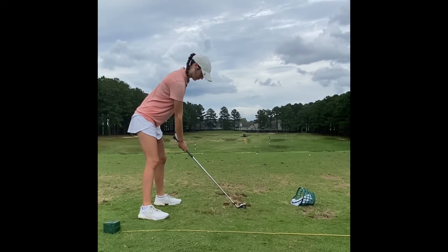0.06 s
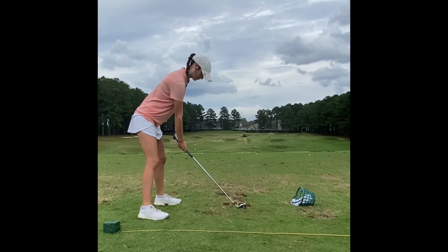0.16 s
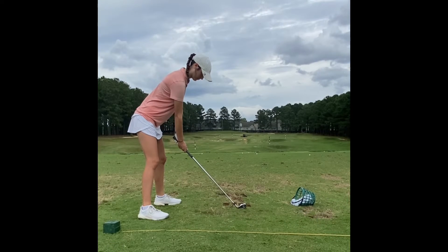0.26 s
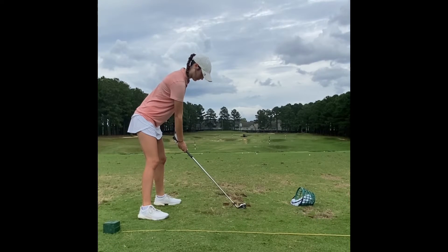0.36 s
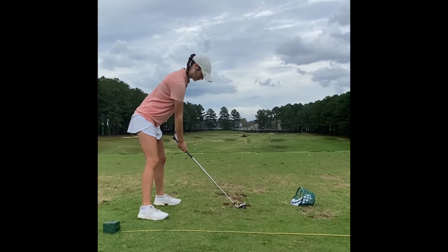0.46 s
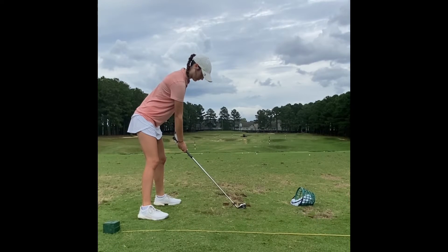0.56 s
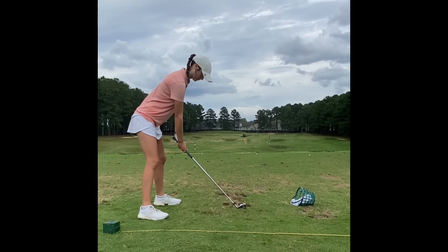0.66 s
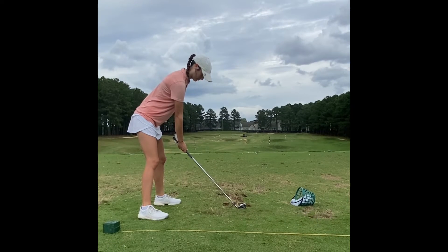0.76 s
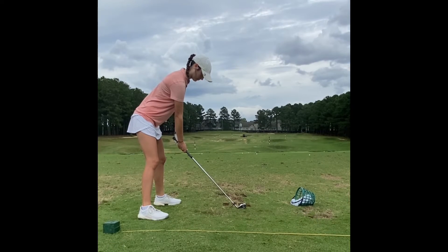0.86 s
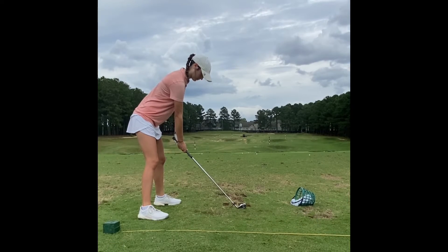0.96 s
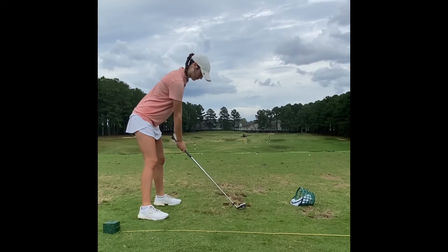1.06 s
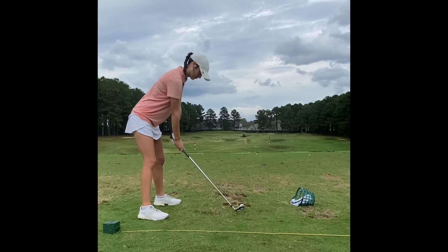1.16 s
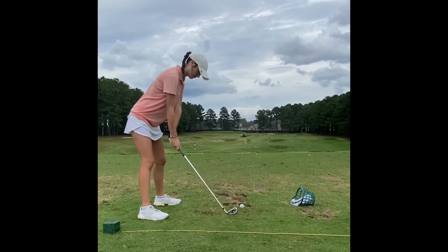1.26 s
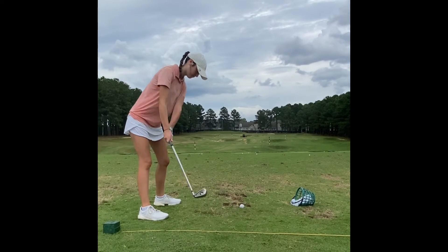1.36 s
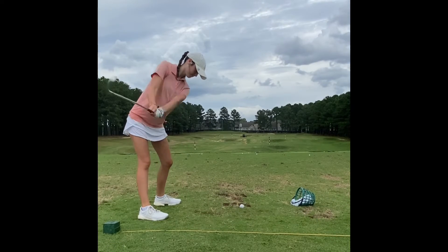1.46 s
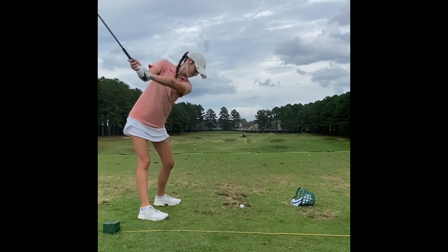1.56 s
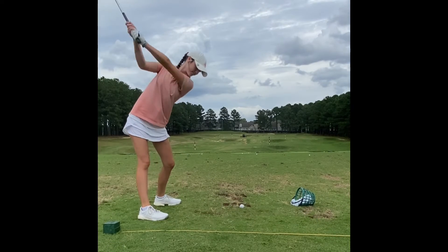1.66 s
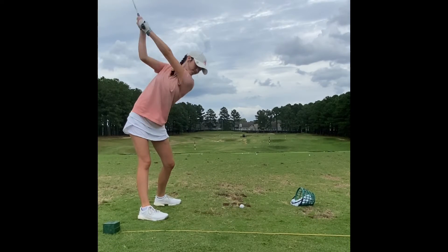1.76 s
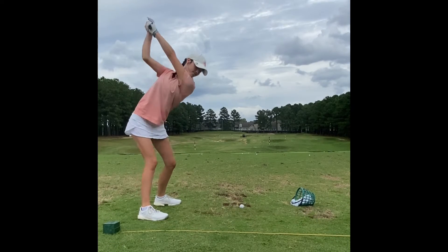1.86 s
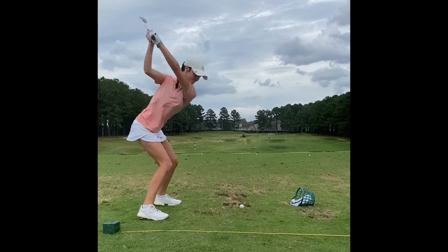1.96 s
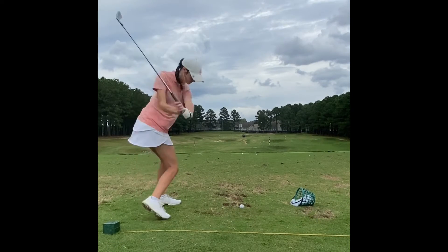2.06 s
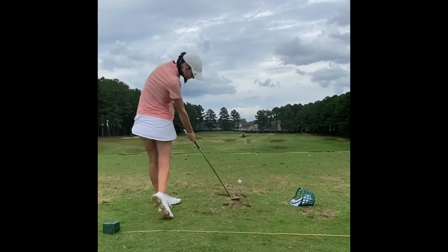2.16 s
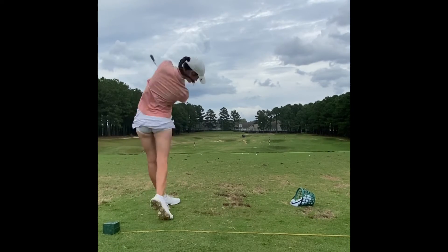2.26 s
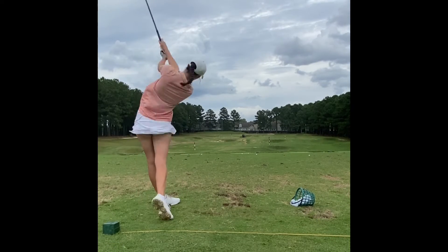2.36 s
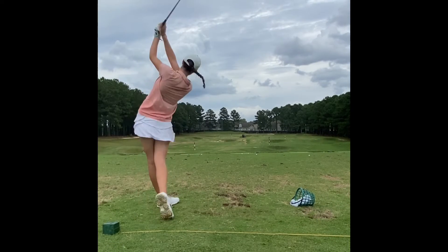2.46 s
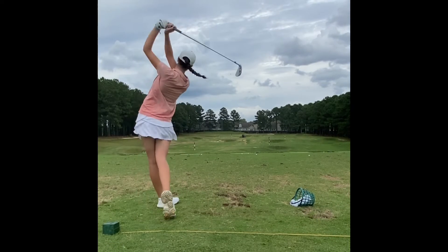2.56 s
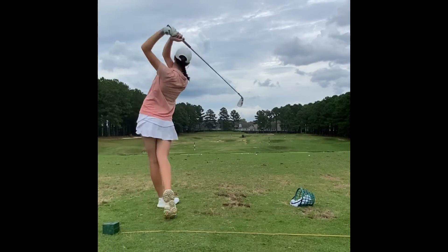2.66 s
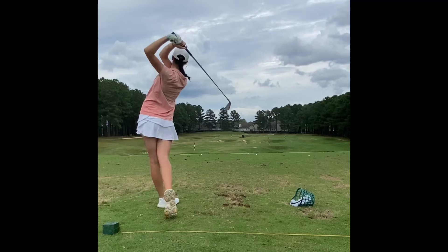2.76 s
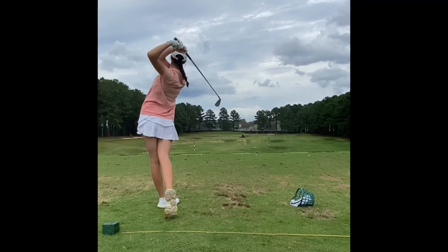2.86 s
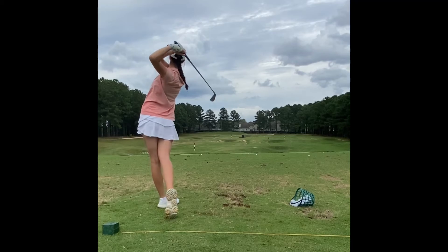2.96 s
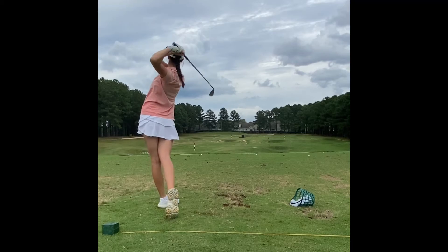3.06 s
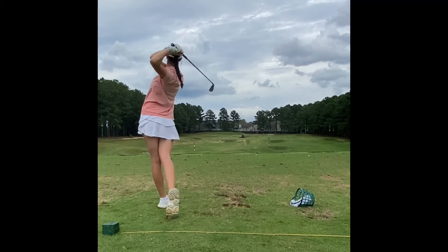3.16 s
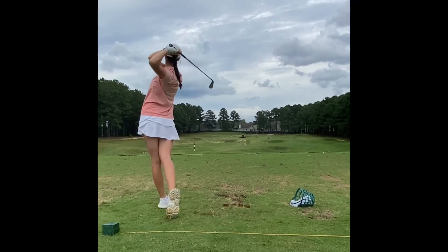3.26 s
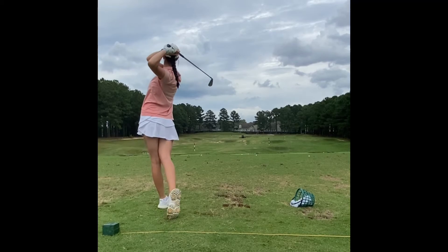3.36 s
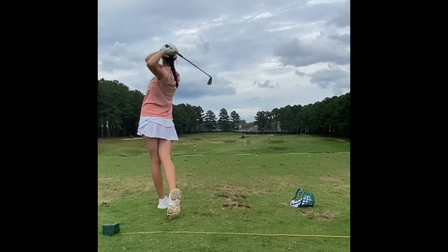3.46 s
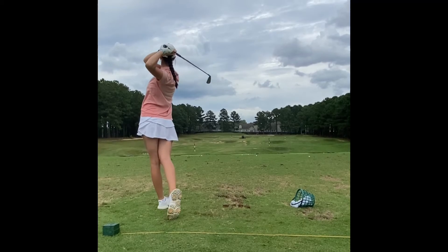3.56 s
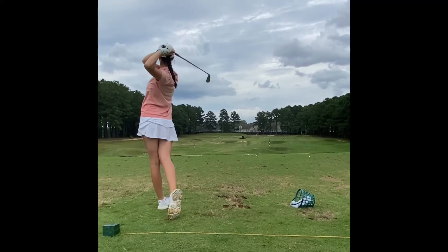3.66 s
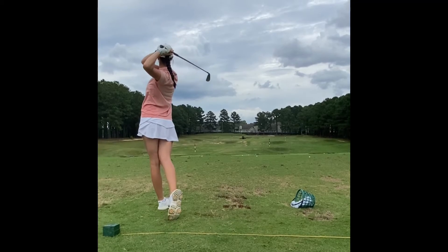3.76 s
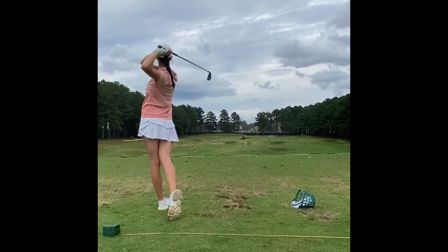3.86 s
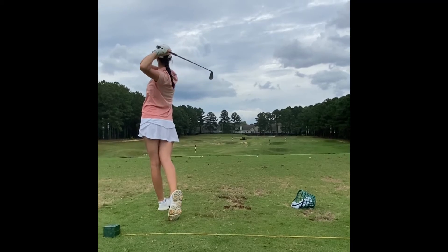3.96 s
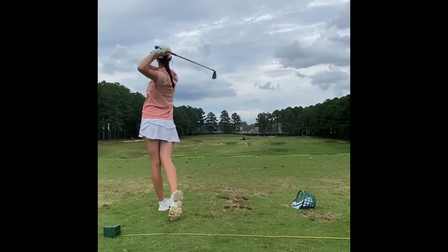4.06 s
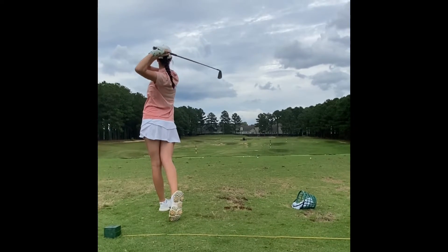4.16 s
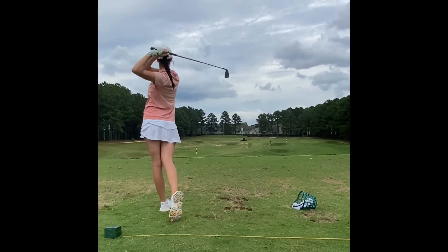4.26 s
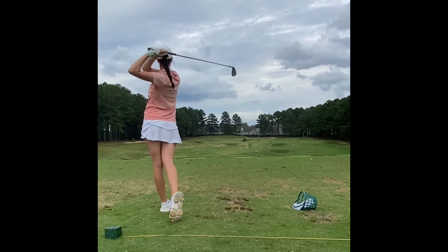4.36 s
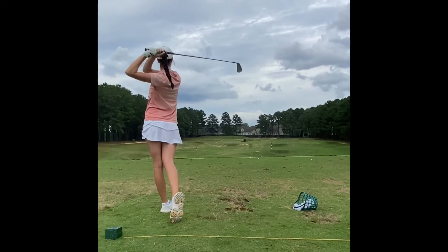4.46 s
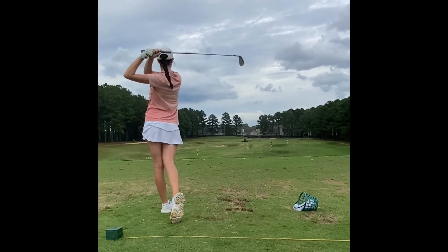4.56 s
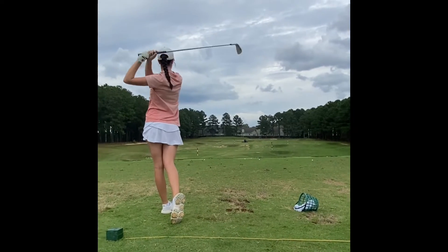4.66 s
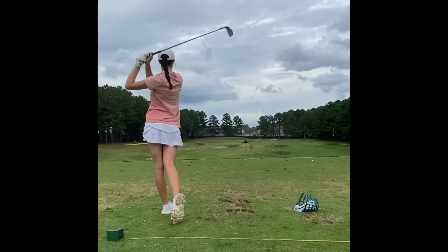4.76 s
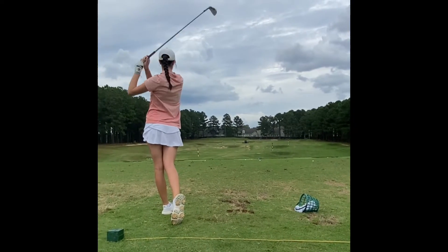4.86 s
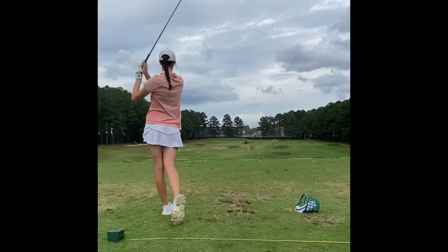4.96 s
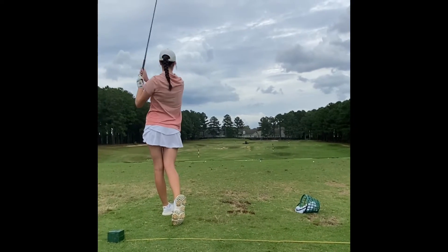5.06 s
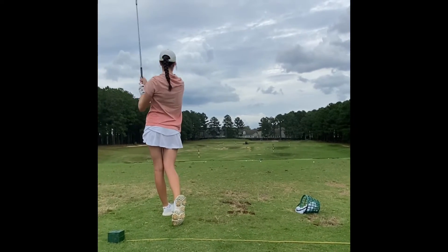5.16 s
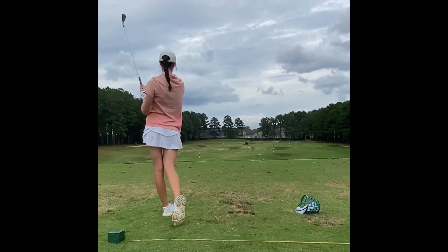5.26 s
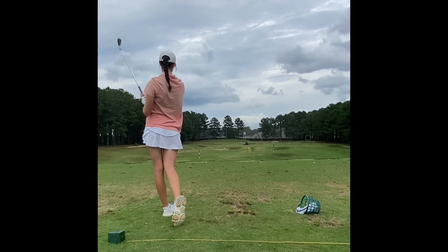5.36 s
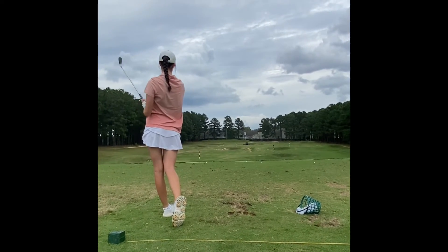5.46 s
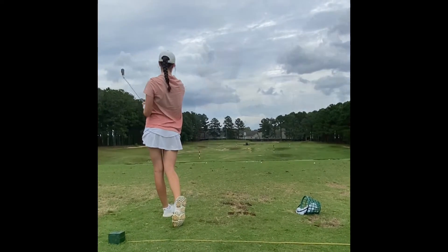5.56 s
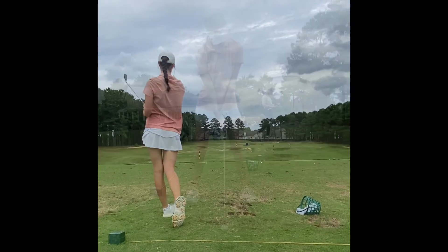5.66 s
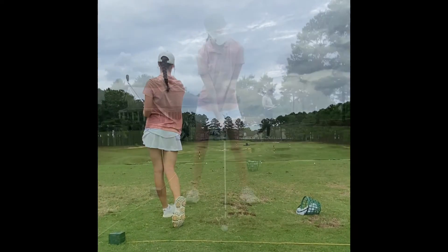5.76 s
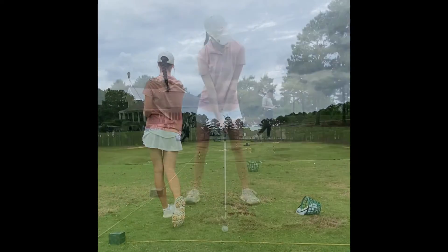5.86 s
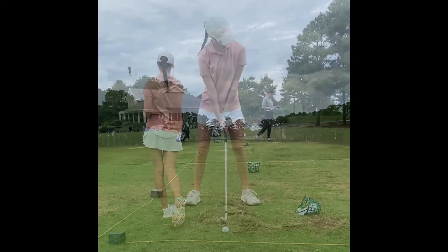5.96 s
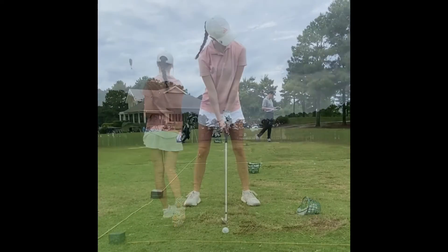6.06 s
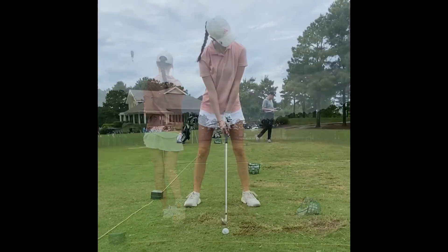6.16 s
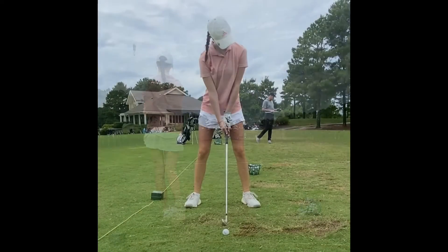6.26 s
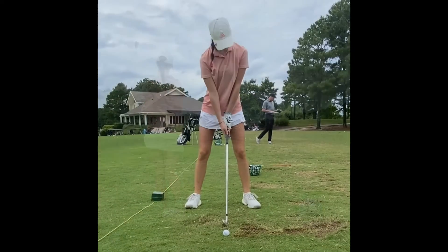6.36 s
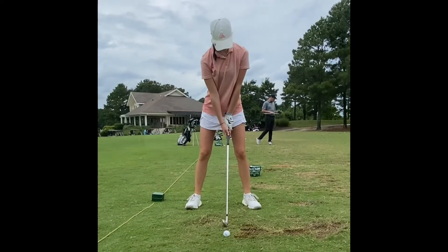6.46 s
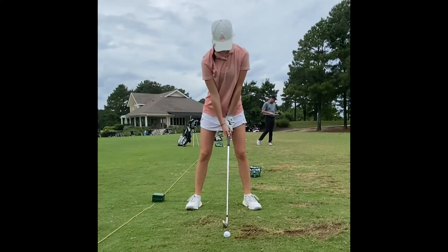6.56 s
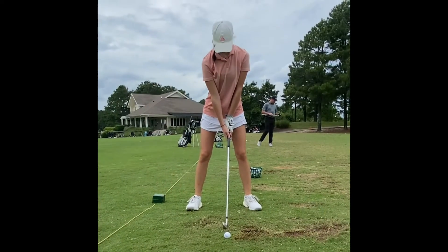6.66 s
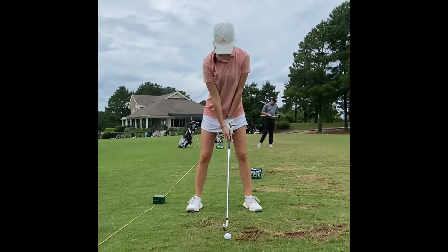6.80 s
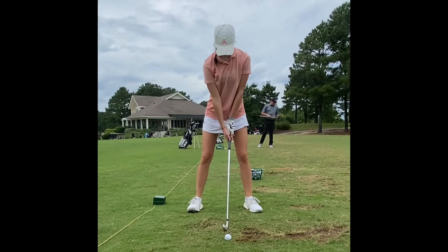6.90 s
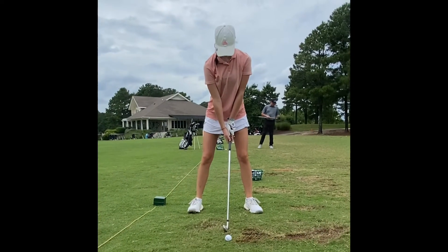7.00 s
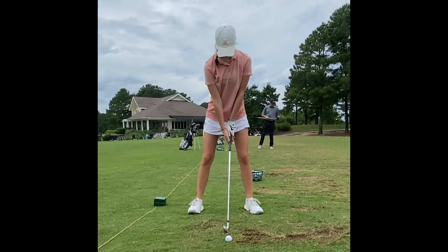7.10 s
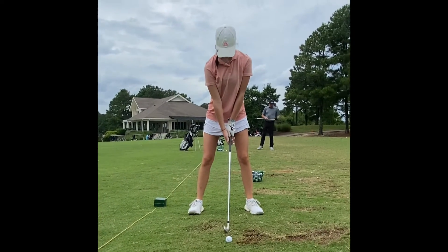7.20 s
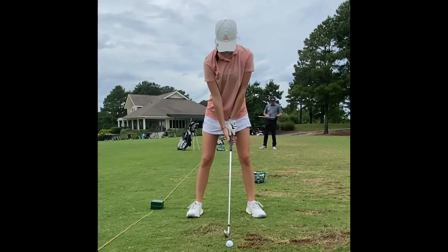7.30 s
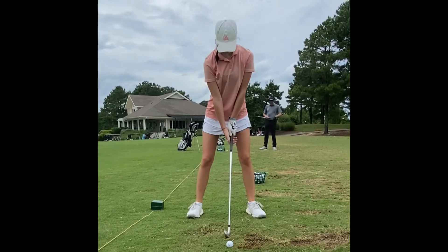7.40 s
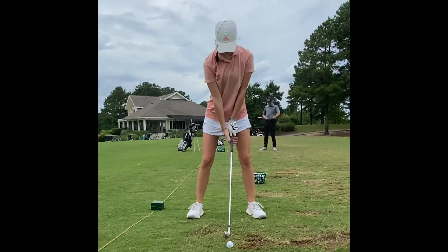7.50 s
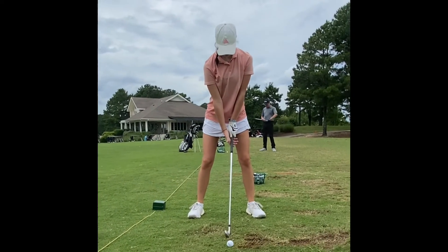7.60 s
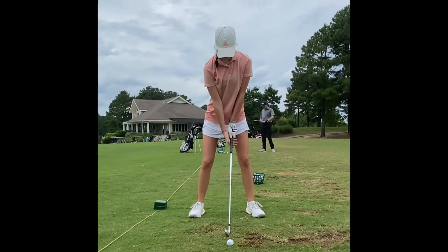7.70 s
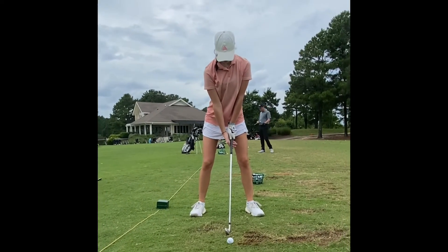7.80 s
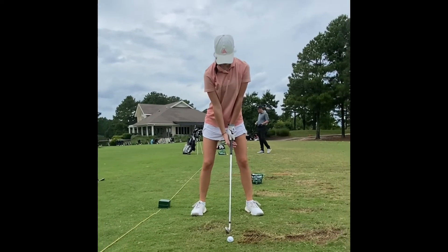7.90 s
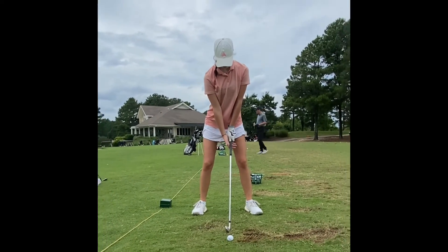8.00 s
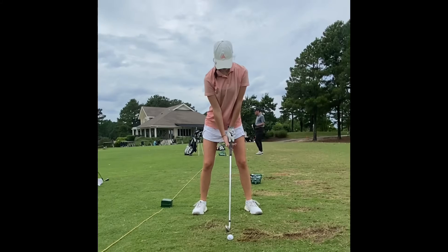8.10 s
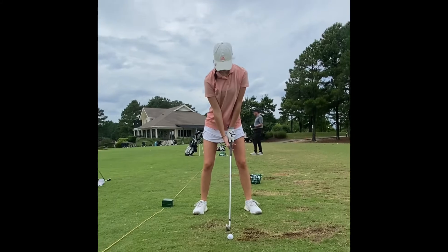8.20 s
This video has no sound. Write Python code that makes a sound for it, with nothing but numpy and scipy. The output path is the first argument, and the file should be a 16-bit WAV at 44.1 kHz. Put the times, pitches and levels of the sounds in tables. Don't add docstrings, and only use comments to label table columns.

```python
import sys
import numpy as np
from scipy import signal
from scipy.fft import rfft, irfft, next_fast_len
from scipy.io import wavfile
from scipy.ndimage import uniform_filter1d, map_coordinates

SR = 44100
rng = np.random.default_rng(int(sys.argv[2]) if len(sys.argv) > 2 else 0)


def amplitude_ratio(level_db):
    exponent = np.asarray(level_db, float) / 20
    return 10 ** exponent


def bounce(signal):
    frames = np.transpose(np.atleast_2d(signal))
    limited = np.clip(frames, -1, 1)
    pcm = np.round(limited * 32767).astype(np.int16)
    wavfile.write(sys.argv[1], SR, pcm)


N = 363191
TIME = np.arange(N) / SR

# f/Hz, side minus mid/dB
DIFFUSE_WIDTH = [(60, -30.5), (110, -26.5), (200, -16.5), (380, -4), (700, 4), (1290, -4.5), (2380, 3),
                 (4400, -6), (8120, 7.5), (15000, -8)]
# f/Hz, side minus mid/dB
NEAR_WIDTH = [(60, -23.5), (110, -24.5), (200, -15.5), (380, -11), (700, -5.5), (1290, -8), (2380, -5),
              (4400, -5.5), (8120, -4), (15000, 1.5)]
# f/Hz, density/dB per Hz
TOP_SPECTRUM = [(7000, -120), (8000, -41), (8800, 0), (10500, 0.5), (12400, -4), (15000, -4), (16500, -1.5)]
# f/Hz, width/Hz, level/dB
CLUB_METAL = [(2490, 200, -4), (3604, 150, -5), (4070, 210, -1), (4924, 230, -8.5), (5810, 240, -5.5),
              (6970, 500, -23.5)]


def unit(x):
    return x / np.sqrt(np.mean(x ** 2) + 1e-20)


def along(points, hz):
    f, v = np.transpose(points)
    return np.interp(np.log(hz + 1), np.log(f + 1), v)


def curves(rows, outside=None):
    s, *cols = np.transpose(rows)
    return [np.interp(TIME, s, c, outside, outside) for c in cols]


def wobble(rate):
    return map_coordinates(rng.standard_normal(int(N * rate / SR) + 4), [TIME * rate])


def swell(s, db, rise, fall):
    return db - 20 * np.maximum((s - TIME) / rise, (TIME - s) / fall)


def filtered(x, response):
    m = next_fast_len(x.shape[-1] + 4096)
    spectrum = rfft(x, m) * response(np.fft.rfftfreq(m, 1 / SR))
    return irfft(spectrum, m)[..., :x.shape[-1]]


def noise(size, spectrum, width, tilt_db=0.):
    def response(hz):
        gain = amplitude_ratio(along(spectrum, hz) + tilt_db * np.log2((hz + 1) / 2000))
        return gain * [1 + 0 * hz, amplitude_ratio(along(width, hz))]
    mid, side = filtered(rng.standard_normal((2, size)), response)
    return np.array([mid + side, mid - side]) / np.sqrt(np.mean(mid ** 2))


def patchy(x, patchy_db):
    z = signal.stft(x, nperseg=512)[2]
    field = uniform_filter1d(rng.standard_normal(z.shape[1:]), size=5, axis=0)
    field = uniform_filter1d(field, size=12, axis=1)
    return signal.istft(z * amplitude_ratio(patchy_db * unit(field)), nperseg=512)[1][:, :N]


def add(track, s, sound, pan_db=0.):
    part = track[:, round(s * SR):][:, :sound.shape[-1]]
    part += (sound * amplitude_ratio([[pan_db / 2], [-pan_db / 2]]))[:, :part.shape[1]]


def steel(f, body=CLUB_METAL):
    modes = enumerate(body)
    return sum((-1) ** k * amplitude_ratio(db) * 1j * f * w / (c * c - f * f + 1j * f * w) for k, (c, w, db) in modes)


def traffic_rumble(road_db):
    # f/Hz, density/dB per Hz
    spectrum = [(18, -41), (30, -9), (70, 3), (97, -1.5), (123, -3), (212, -11.5), (291, -16.5),
                (355, -20.5), (381, -21.5), (500, -30.5), (650, -57), (1100, -120)]
    return amplitude_ratio(road_db + 2.5 + 1.5 * wobble(6.9)) * noise(size=N, spectrum=spectrum, width=DIFFUSE_WIDTH)


def tyre_noise(road_db):
    # f/Hz, density/dB per Hz
    spectrum = [(300, -27), (450, -1), (750, -1.5), (1200, -11.5), (1800, -44)]
    level_db = -71.5 + .5 * (road_db - road_db.mean()) + 0.4 * wobble(3.5)
    return amplitude_ratio(level_db) * noise(size=N, spectrum=spectrum, width=DIFFUSE_WIDTH)


def wind_in_trees():
    # f/Hz, density/dB per Hz
    first_trees = [(530, -30.5), (900, -5.5), (1340, -3), (2020, -10.5), (2280, -8.5), (4000, -12.5),
                   (4870, -20), (6420, -26), (7670, -21), (8280, -28), (8750, -44.5), (10200, -33.5),
                   (12600, -38), (16400, -68), (22000, -120)]
    # f/Hz, density/dB per Hz
    second_trees = [(530, -45), (900, -8), (1240, 4), (1370, -2.5), (1600, -2.5), (2970, -7.5),
                    (4090, -7.5), (6710, -20.5), (7840, -26), (8370, -16), (8950, -37), (11200, -32),
                    (12600, -37), (16400, -64), (22000, -120)]
    # t/s, level/dB
    breeze = [(0, -72), (.6, -70), (1.4, -72.5), (3.8, -73), (5.2, -73.5), (6.2, -74), (7.7, -72),
              (8.24, -70.5)]
    second = np.clip((TIME - 5.7) / 0.58, 0, 1)
    first_wind = np.sqrt(1 - second) * noise(size=N, spectrum=first_trees, width=DIFFUSE_WIDTH)
    second_wind = np.sqrt(second) * noise(size=N, spectrum=second_trees, width=DIFFUSE_WIDTH)
    return amplitude_ratio(curves(breeze)[0] + 0.24 * wobble(3)) * (first_wind + second_wind)


def insects():
    # f/Hz, density/dB per Hz
    spectrum = [(6600, -42.5), (7200, -5.5), (7800, 1), (8300, -9.5), (8800, -37)]
    # t/s, level/dB
    chorus = [(0, -92), (.4, -88), (1.9, -88), (2.2, -100), (2.55, -89), (5.8, -88.5), (6.6, -82),
              (7.4, -87), (8.24, -80.5)]
    level_db = curves(chorus)[0] + .7 * wobble(8)
    return amplitude_ratio(level_db) * noise(size=N, spectrum=spectrum, width=DIFFUSE_WIDTH)


def background():
    # t/s, level/dB
    road = [(0.0, -52), (0.55, -50), (0.85, -51.5), (1.42, -52), (2.45, -51.5), (2.73, -50), (3.12, -50),
            (3.44, -48.5), (3.74, -50), (7.06, -52), (7.82, -49.5), (8.24, -51)]
    # f/Hz, left minus right/dB
    balance = [(60, 0.0), (110, 0.0), (200, 0.0), (380, 0.5), (700, 3.0), (1290, 4.0), (2380, 1.0),
               (4400, -1.0), (8120, 0.0), (15000, 0.0)]
    road_db = curves(road)[0]
    diffuse = traffic_rumble(road_db) + insects()
    diffuse = diffuse + patchy(tyre_noise(road_db) + wind_in_trees(), patchy_db=2.0)
    return filtered(diffuse, lambda hz: amplitude_ratio(np.outer([.5, -.5], along(balance, hz))) * (hz < 12500))


def pips():
    # t/s, peak level/dB, f/Hz, t60/s
    rung = [(.027, -67, 10200, .03), (.525, -58, 2800, .25), (.466, -60, 2700, 0.053),
            (.945, -61, 4200, 0.15), (.95, -64, 3450, .15), (.48, -60, 2750, .2), (.59, -62, 2800, .15),
            (0.569, -61, 3350, .06), (.4643, -59, 3420, .04), (0.464, -60, 6200, .04),
            (.4997, -58, 2870, .06), (.502, -61, 4250, .04), (.503, -60, 6000, 0.08),
            (.6219, -57, 2600, .05), (3.3362, -57, 2170, .03), (3.3757, -54, 2260, .03),
            (3.4051, -53.5, 2300, .03), (3.445, -58, 2420, .03), (3.4734, -54, 2470, .04),
            (3.5223, -56, 2350, 0.035), (4.426, -56, 3200, .02), (4.055, -54, 5600, .05),
            (4.162, -57, 5500, .08), (3.937, -56, 5700, .1), (4.4635, -62, 1710, .02),
            (5.305, -65, 4600, .03), (6.0663, -60.5, 4820, 0.028), (6.855, -57, 1687, 0.034),
            (2.3375, -55, 3000, .05), (2.365, -60, 4800, .1), (2.612, -56, 2500, .07),
            (2.63, -63, 5300, .04), (2.205, -50, 1250, .1), (2.235, -55, 1750, .05), (2.062, -50, 780, .08),
            (2.003, -53, 1220, .06), (4.092, -54, 4300, .05)]
    out, t = np.zeros((2, N)), np.arange(SR // 8) / SR
    for s, db, hz, t60 in rung:
        burst = amplitude_ratio(-60 * t / max(t60, .004)) * noise(size=len(t), spectrum=[(100, 0)], width=NEAR_WIDTH)
        note = filtered(burst, lambda f: steel(f, [(hz, 0.21 * hz, 0)]) ** 2)
        add(out, s, amplitude_ratio(db) * note / abs(note).max())
    return out


def thuds():
    # t/s, level/dB, first f/Hz, last f/Hz, t60/s
    blows = [(0.292, -48, 127, 109, 0.1), (0.455, -44, 420, 363, 0.17), (1.289, -34.5, 249, 232, 0.055),
             (2.1775, -19.5, 220, 75, .11), (3.2203, -20.5, 245, 100, .045), (3.2169, -24, 567, 300, 0.02),
             (3.2055, -26, 480, 430, .02), (2.153, -31, 170, 120, .04), (3.65, -32, 89.8, 75.6, 0.0597),
             (4.430, -26.5, 247, 213.6, 0.049)]
    sink_s = .0063
    out, t = np.zeros((2, N)), np.arange(SR // 3) / SR
    for s, db, first_hz, last_hz, t60 in blows:
        turns = last_hz * t + (first_hz - last_hz) * sink_s * (1 - np.exp(-t / sink_s))
        envelope = amplitude_ratio(db - 60 * t / t60) * (1 - np.exp(-t / .003))
        add(out, s, envelope * np.sin(2 * np.pi * turns))
    return out


def slides():
    scrapes = [(.466, -63, .006, 0.057, -40), (.505, -67, .008, .25, -40),
               (3.643, -54.5, .012, 0.025, -21.5), (3.68, -65, 0.017, .13, -21),
               (3.937, -56.5, 0.0052, 0.077, -23), (4.1, -54.5, 0.068, 0.023, -12),
               (4.18, -64, 0.085, .04, -16)]
    body = unit(filtered(noise(size=N, spectrum=[(100, 0)], width=NEAR_WIDTH), steel))
    top = noise(size=N, spectrum=TOP_SPECTRUM, width=NEAR_WIDTH)
    chatter = amplitude_ratio(2.7 * wobble(220) - 5.5)
    return chatter * sum(amplitude_ratio(swell(*row)) * (body + amplitude_ratio(top_db) * top) for *row, top_db in scrapes)


def torn_air():
    # f/Hz, density/dB per Hz
    spectrum = [(180, -38), (300, -10), (691, -.5), (813, -7.5), (1200, -2.5), (1450, -7.5), (2690, -6.5),
                (3430, -11.5), (4100, -12), (4680, -22), (5400, -20), (7500, -35), (9750, -65),
                (16500, -120)]
    # t/s, level/dB
    swing = [(1.8, -93), (1.9, -70), (2.096, -60.5), (2.124, -41), (2.146, -42), (2.16, -49), (2.19, -58),
             (2.3, -65), (2.35, -63), (2.43, -67), (2.475, -62), (2.6, -68), (2.78, -79)]
    # t/s of peak, level/dB, rise/s, fall/s; times for 20 dB
    puffs = [(0.47, -66, 0.012, 0.075), (.505, -68.5, 0.018, 0.46), (3.199, -60, 0.074, 0.044),
             (3.36, -64, 0.31, 0.61)]
    dull_db, bright_db = -85.5, -45
    dull, bright = (noise(size=N, spectrum=spectrum, width=NEAR_WIDTH, tilt_db=tilt) for tilt in (-1.5, 2))
    top = noise(size=N, spectrum=TOP_SPECTRUM, width=NEAR_WIDTH, tilt_db=-8)
    swing_db = curves(swing, -150)[0]
    puffs_db = np.max([swell(*row) for row in puffs], axis=0)
    level_db = np.maximum(swing_db, puffs_db)
    share = np.clip((level_db - dull_db) / (bright_db - dull_db), 0, 1)
    far, near = puffs_db > swing_db, swing_db > puffs_db

    hiss_db = -76 + .8 * (level_db + 59.5) - 8.5 * far + 2.3 * wobble(12)
    hiss_db = hiss_db + swell(2.22, 1, 9, 1.6) * near
    hiss = amplitude_ratio(hiss_db) * (level_db > dull_db)
    low = filtered(top, lambda hz: hz < 12500)
    sheen = amplitude_ratio(4 * wobble(9) - .8 * abs(swing_db + 62) + swell(2.28, 3, .8, .4)) * near
    hiss = hiss * (low + sheen * (top - low))
    return amplitude_ratio(level_db) * (np.sqrt(share) * bright + np.sqrt(1 - share) * dull) + hiss


def sleeves():
    # f/Hz, density/dB per Hz
    spectrum = [(250, -36.5), (480, 3), (900, 1.5), (1800, -8.5), (3500, -20.5), (6000, -58), (9000, -120)]
    rustles = [(1.91, -63.5, 0.051, 0.23), (2.069, -64.5, 0.36, 0.59), (2.47, -70.5, .2, 0.094),
               (4.301, -69.5, .9, 0.96), (5.5, -68, 1.09, 1.14)]
    return sum(amplitude_ratio(swell(*row)) for row in rustles) * noise(size=N, spectrum=spectrum, width=NEAR_WIDTH)


def shaft_hum():
    # t/s, f/Hz, level/dB
    shaft = [(3.11, 230, -60), (3.13, 270, -50), (3.15, 350, -48), (3.168, 420, -44), (3.182, 430, -47),
             (3.195, 400, -45), (3.208, 380, -43), (3.217, 340, -48)]
    hz, hum_db = curves(shaft)
    tone = np.sin(2 * np.pi * np.cumsum(hz) / SR) * (abs(TIME - 3.165) < .055)
    return amplitude_ratio(hum_db) * (.9 + 0.6 * wobble(220)) * tone


def swish():
    eddies = amplitude_ratio(1.7 * wobble(260))
    return patchy((torn_air() + sleeves()) * eddies, patchy_db=1.8) + shaft_hum()


def treeline(x):
    # f/Hz, t60/s
    decay = [(200, .25), (2000, 0.24), (10000, 0.087)]
    hz, t, z = signal.stft(rng.standard_normal((2, SR // 2)), SR, nperseg=256)
    tail = signal.istft(z * amplitude_ratio(-60 * t / along(decay, hz)[:, None]), SR, nperseg=256)[1]
    return signal.fftconvolve(x, tail / np.linalg.norm(tail[0]), axes=1)[:, :N]


def birds():
    # t/s, length/s, first f/Hz, last f/Hz, level/dB
    calls = [(.741, .062, 6300, 7050, -83), (.925, .08, 3400, 3520, -72), (.935, .065, 4250, 4050, -72),
             (1.22, .05, 3520, 3480, -78), (.85, .03, 4100, 4080, -83), (1.112, .022, 5900, 5850, -84),
             (5.12, .08, 3520, 3420, -83), (.72, .12, 3000, 2860, -82), (.83, .05, 2750, 2350, -80),
             (4.65, .03, 6480, 6480, -89), (4.745, .05, 6280, 6250, -89), (4.82, .07, 6100, 6300, -90),
             (4.897, .045, 7000, 6300, -86), (4.95, .045, 6300, 6280, -86),
             (5.515, .055, 3420, 3380, -77.5), (6.751, .045, 5080, 4990, -77), (2.46, .05, 950, 1300, -63),
             (7.505, .31, 2590, 2750, -71), (7.85, .09, 2740, 2750, -82), (2.993, .154, 1120, 1070, -73),
             (5.283, .17, 1412, 1130, -70.5), (7.768, .11, 1200, 1040, -76),
             (7.893, .13, 1282, 1024, -75.5)]
    out, flutter, waver = np.zeros((2, N)), wobble(220), wobble(30)
    for s, length, first_hz, last_hz, db in calls:
        u = np.arange(int(length * SR)) / (length * SR)
        start = round(s * SR)
        rough = .025 / max(length, .09) ** 2 * flutter[start:][:len(u)]
        hz = first_hz + (last_hz - first_hz) * (1 - (1 - u) ** 1.9) + 30 * rough
        phase = 2 * np.pi * np.cumsum(hz) / SR
        level = amplitude_ratio(db + rough + 1.3 * waver[start:][:len(u)])
        shape = level * np.clip(9 * u, 0, 1) * (1 - u) ** .55 * (1.1 + .8 * u)
        octave = amplitude_ratio(-5) * (length > .26) * u ** .9 * np.sin(2 * phase)
        add(out, s, shape * (np.sin(phase) + octave), pan_db=5.5)
    return out + amplitude_ratio(-8) * treeline(out)


def ticks():
    # t/s, peak level/dB, left minus right/dB
    grit = [(1.8488, -54, 1.0), (2.2147, -45, 3.0), (2.2732, -48, 1.0), (2.3514, -50, -6), (2.4097, -43, 4),
            (2.4613, -54, 1.0), (2.5494, -51, 0.5), (2.6834, -54, -2), (2.243, -54, 1), (2.287, -56, 1),
            (2.481, -59, 1), (2.567, -60, 0), (2.594, -58, 0), (2.617, -61, 0), (2.652, -62, 0),
            (2.74, -64, 0)]
    # t/s, peak level/dB, left minus right/dB
    steps = [(1.886, -56, 0.95), (2.004, -55, 0.5), (2.997, -47.5, 0.35)]
    # t/s, peak level/dB, left minus right/dB
    clubs = [(3.6412, -40, 2.1), (3.6544, -53, 3.0), (3.681, -40.5, 5.3), (3.69, -57, 1.5),
             (3.7118, -43.5, 3.5), (3.718, -48, 2.7)]
    # t/s, peak level/dB, left minus right/dB
    buckles = [(1.5304, -60, -1), (1.9633, -53, 0.5), (3.9376, -61, 6), (3.974, -50.5, 3), (4.0557, -49, 4),
               (4.0715, -46.5, 10), (4.1134, -50, 8), (4.16, -59, 5), (4.193, -71, 0.5), (4.335, -50.5, 4),
               (4.5077, -66, 0), (6.0663, -60, -4)]
    # gain/dB, t60/s, top/dB, knock/dB
    kinds = [
        (-1, 0.027, -31.5, -11.5),
        (-7, 0.029, -30, 2.5),
        (2, 0.043, -31, -16.5),
        (-3, 0.027, -12, -5),
    ]
    # f/Hz, width/Hz, level/dB
    stone = [(2600, 500, -12), (3920, 320, 0), (5424, 300, -9)]
    # f/Hz, density/dB per Hz
    dull = [(400, -29.5), (800, -2.5), (1500, 0), (2200, -11.5), (4000, -36)]
    out, t = np.zeros((2, N)), np.arange(SR // 20) / SR
    bodies = (stone, CLUB_METAL, CLUB_METAL, CLUB_METAL)
    for rows, solid, (gain_db, t60, top_db, knock_db) in zip((grit, steps, clubs, buckles), bodies, kinds):
        snap = 1 + amplitude_ratio(5 - 60 * t / .004)
        fade = amplitude_ratio(-60 * t / max(t60, .004)) * snap
        for s, db, pan_db in rows:
            shift = 1 + .04 * rng.uniform(-1, 1)
            burst = fade * noise(size=len(t), spectrum=[(100, 0)], width=NEAR_WIDTH)
            body = filtered(burst, lambda f: steel(f * shift, solid))
            top = amplitude_ratio(top_db - 5) * fade ** 1.6 * noise(size=len(t), spectrum=TOP_SPECTRUM, width=NEAR_WIDTH)
            knock = amplitude_ratio(knock_db - 3.0) * fade * noise(size=len(t), spectrum=dull, width=NEAR_WIDTH)
            add(out, s, amplitude_ratio(db + gain_db) * (body / abs(body).max() + top + knock), pan_db)
    return out


def strikes():
    # t/s, level/dB, f/Hz, t60/s, left minus right/dB
    rings = [(2.1629, -28, 2400, .005, 0), (2.1665, -33, 5400, .03, 6), (2.17125, -5.5, 2250, .005, -3),
             (2.17342, 1, 1295, .0062, 2), (2.17566, -10.5, 1295, .007, 3), (2.17295, -10, 740, .012, 0),
             (2.1726, -14, 520, .012, 0), (2.1713, -6, 10600, .003, 4), (2.1730, -20, 330, .025, 0),
             (2.1733, -17, 3800, .015, 1), (2.1733, -14, 1810, .02, 0), (2.1735, -24, 4400, .012, 0),
             (2.1735, -24, 5670, .012, 0), (2.1735, -30, 9300, .015, 2), (2.1712, -18, 15300, .005, 0),
             (2.173, -22, 5170, .015, 0), (2.1626, -30, 7500, .006, 0), (2.1785, -24, 3400, .01, 1),
             (2.182, -28, 1800, .012, 0), (3.2165, -14.5, 1900, .005, -7), (3.217, -30, 750, .01, -3),
             (3.2172, -26, 3800, .008, -7), (3.2172, -26, 3210, .016, -7), (3.217, -26, 1400, .006, -5),
             (3.2172, -31, 9950, .005, -4), (3.2175, -32, 4970, .012, -7), (3.228, -40, 2000, .008, -5),
             (4.057, -60, 1640, .1, 1), (4.076, -53, 1650, .1, 1), (4.3045, -42, 1320, .012, 0),
             (4.16, -62, 1280, .08, 0), (4.334, -50, 5500, .02, 0), (4.3045, -35, 900, .009, 0)]
    # t/s, level/dB, t60/s, tilt/dB per octave, left minus right/dB
    cracks = [(2.1629, -29, .007, 0, 0), (2.166, -37, .05, -5, -5), (2.169, -30, .02, -3, -3),
              (2.1712, -10, .004, 3, 0), (2.1720, -17, .004, 3, 0), (2.1735, -19, .014, -1, 1),
              (2.177, -29, .035, -6, 0), (3.2122, -54, .04, -2, -5), (3.2142, -47, .03, -3, -5),
              (3.2166, -27, .008, 0, -7), (3.219, -38, .025, -3.5, -5), (4.425, -50, .016, -8, 3),
              (1.9035, -43, .016, -7, 0), (3.2265, -42, .035, -3.5, -5), (2.4097, -50, .008, -4, 2),
              (4.3333, -53, .012, 4, 2)]
    # f/Hz, density/dB per Hz
    spectrum = [(300, -30), (700, -2.5), (1100, -1.5), (2200, -3.5), (3500, -2.5), (5700, -5), (7000, -25),
                (8800, -18.5), (10600, -13), (12300, -17.5), (13600, -28.5), (15000, -23), (16500, -36)]
    out, t = np.zeros((2, N)), np.arange(SR // 10) / SR
    rise = 1 - np.exp(-t / .0004)
    for s, db, hz, t60, pan_db in rings:
        add(out, s, -amplitude_ratio(db - 60 * t / t60) * rise * np.sin(2 * np.pi * hz * t), pan_db)
    for s, db, t60, tilt_db, pan_db in cracks:
        fade = amplitude_ratio(-60 * t / t60)
        crack = fade * noise(size=len(t), spectrum=spectrum, width=NEAR_WIDTH, tilt_db=tilt_db)
        even = np.linalg.norm(fade) / np.linalg.norm(crack, axis=1, keepdims=True)
        add(out, s, amplitude_ratio(db) * even * crack, pan_db)
    return out


def ports(hz):
    # f/Hz, lead of the left port/rad
    lead = [(150, 0), (1030, -1.6), (1550, 0), (2580, 1), (4200, 1.8), (8000, .6), (13000, 1.6)]
    octaves = np.log2((hz + 1) / 1000)
    dip = amplitude_ratio(-12 * np.exp(-(octaves / .14) ** 2))
    return dip * np.exp(1j * np.outer([.5, -.5], along(lead, hz)))


def mower():
    engine = [(2, 7), (3, -34), (4, 8.5), (5, 5), (6, 0.5), (8, -10.5)]
    # t/s, level/dB
    drone = [(5.8, -75), (5.85, -75), (6.48, -48.5), (6.78, -66.5), (6.88, -56), (7.91, -62.5), (7.94, -68),
             (8.21, -51), (8.24, -53)]
    turns = np.cumsum(61 * (1 + .03 * wobble(25))) / SR
    orders = sum(amplitude_ratio(db) * (.4 + wobble(70)) * np.sin(2 * np.pi * k * turns) for k, db in engine)
    return amplitude_ratio(curves(drone, -120)[0] + 0.5) * unit(orders)


def scene():
    near = filtered(strikes(), ports) + ticks() + pips() + slides()
    echo = amplitude_ratio(-36.0) * treeline(filtered(near, lambda hz: 1 / (1 + (hz / 6500) ** 4)))
    return near + echo + thuds() + swish() + birds() + mower() + background()


def band_limit(x):
    return signal.sosfilt(signal.butter(12, 17010, fs=SR, output="sos"), x)


def record(dry):
    # f/Hz, level/dB
    phone = [(20, -31), (34, -7), (42, -1), (12500, 0), (12900, -17), (14200, -22.5), (14500, 1.5),
             (15800, 2.5), (16200, -17.5), (16900, -24), (17100, -88.5)]
    mix = filtered(dry, lambda hz: amplitude_ratio(along(phone, hz)))
    return band_limit(mix)


dry = scene()
out = record(dry)
bounce(out)
```